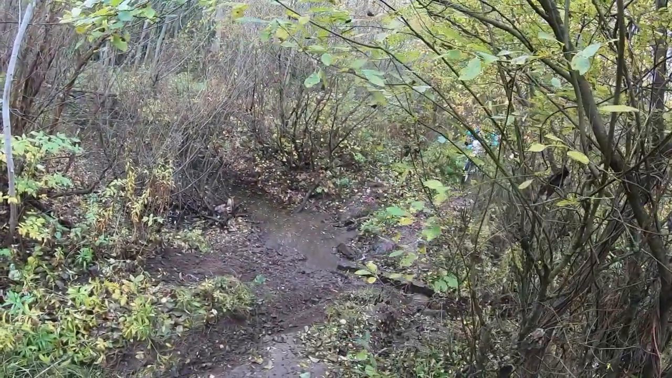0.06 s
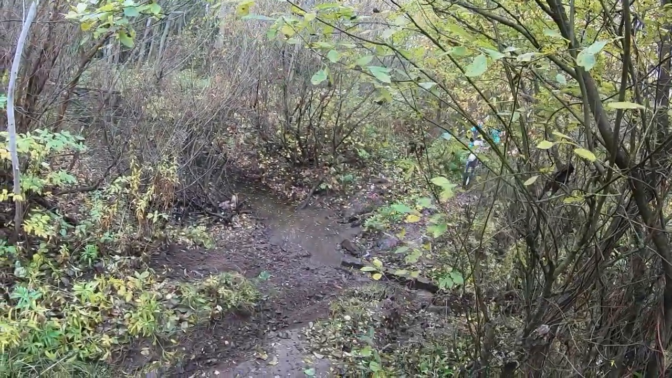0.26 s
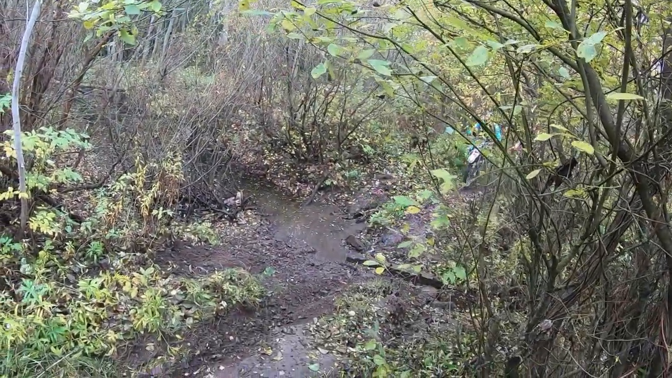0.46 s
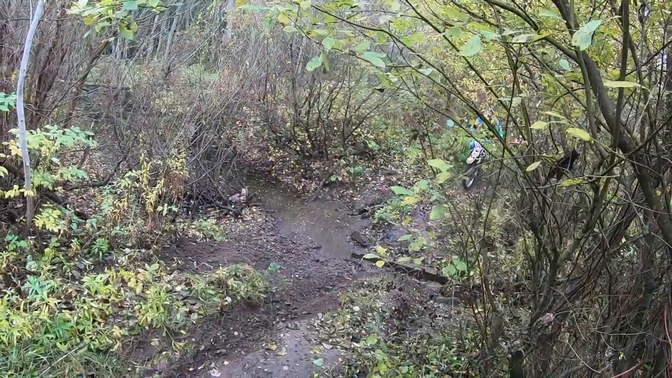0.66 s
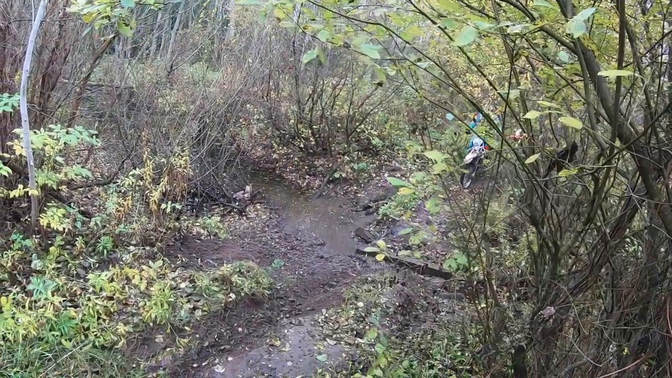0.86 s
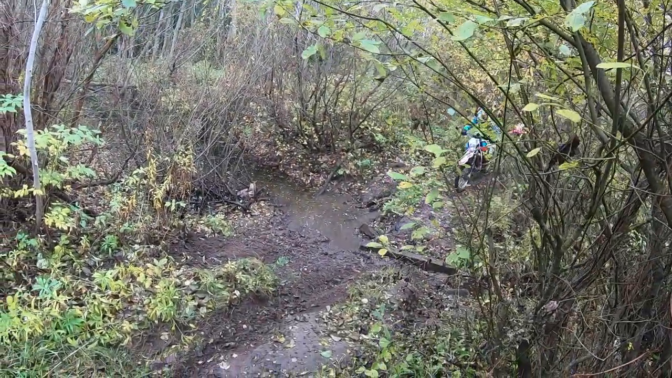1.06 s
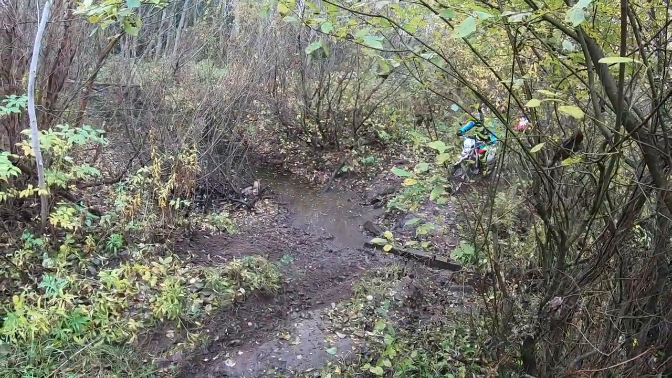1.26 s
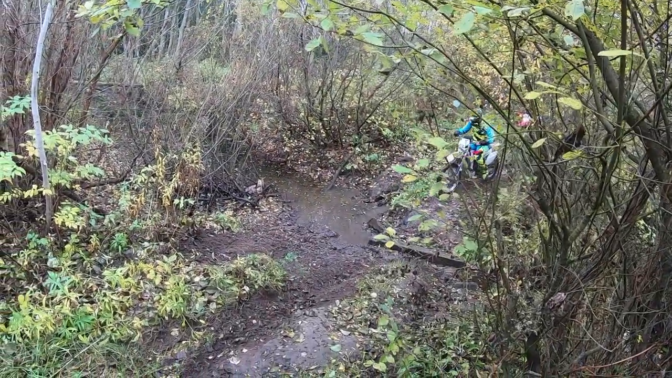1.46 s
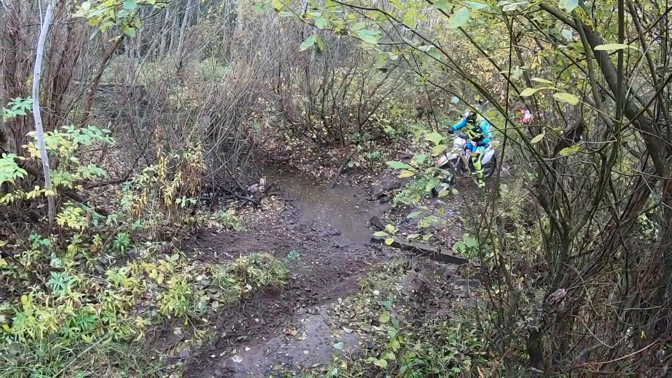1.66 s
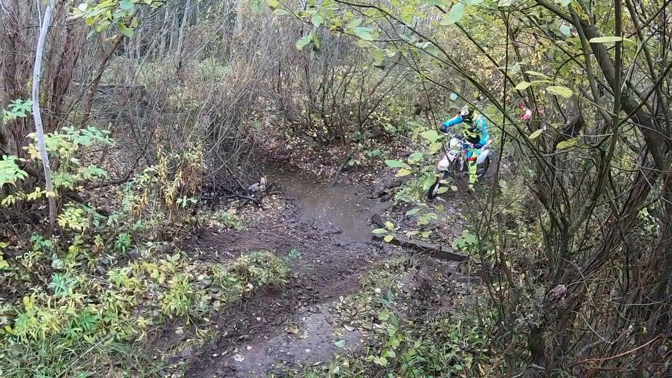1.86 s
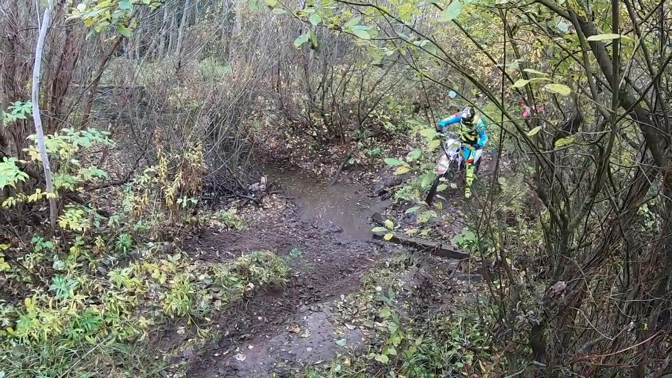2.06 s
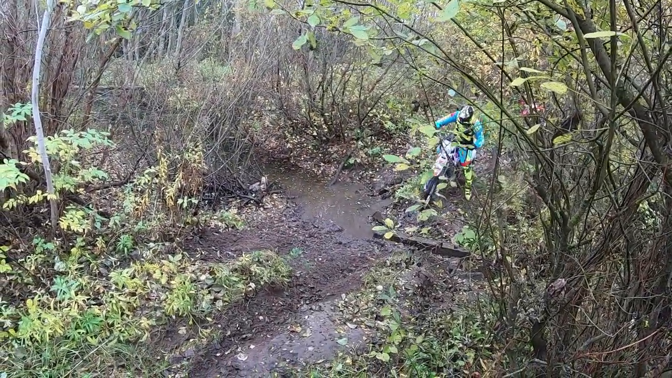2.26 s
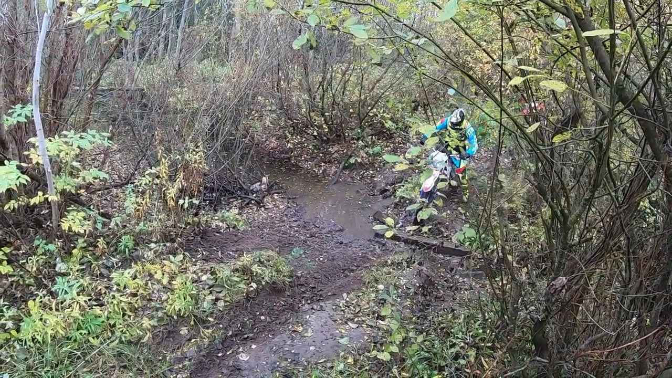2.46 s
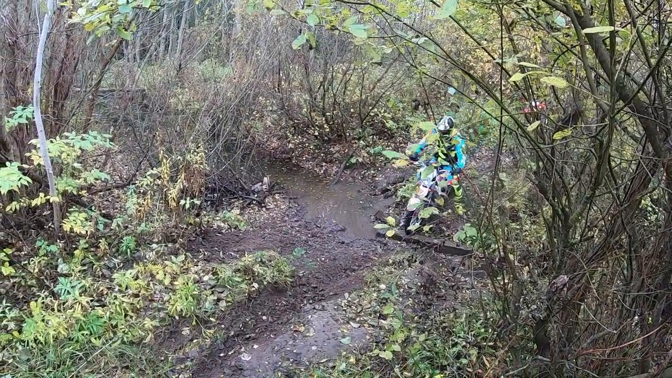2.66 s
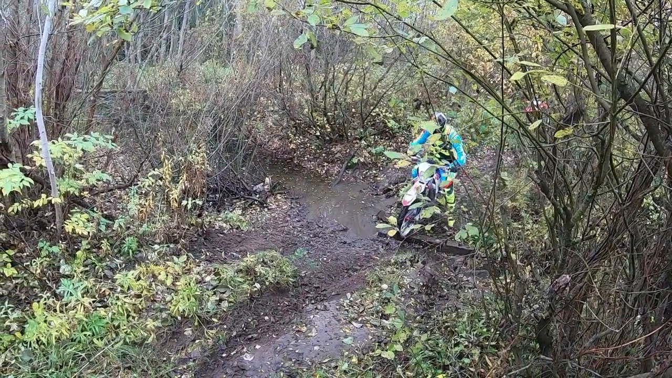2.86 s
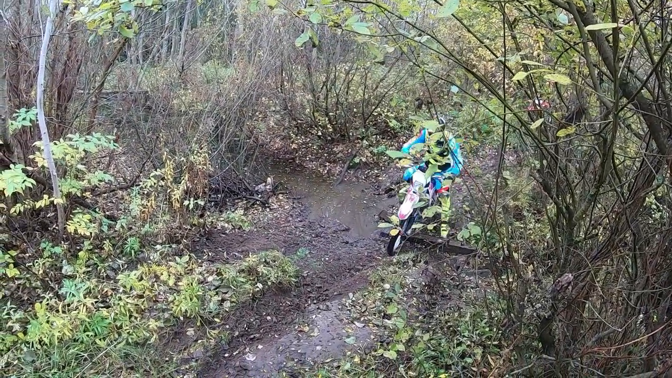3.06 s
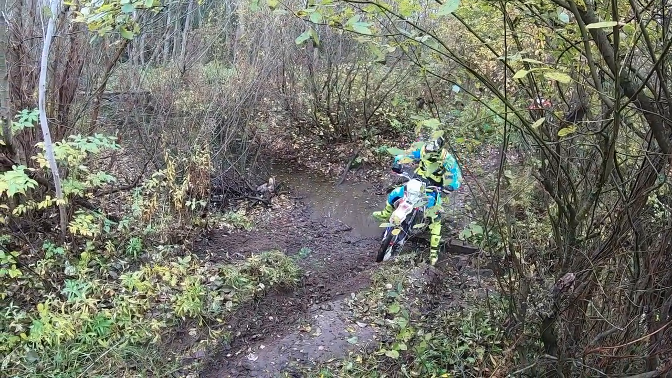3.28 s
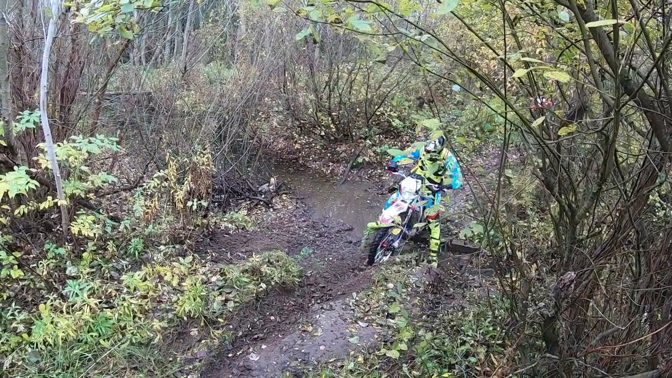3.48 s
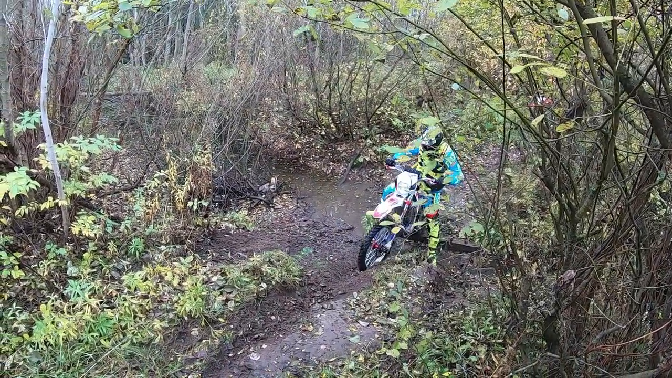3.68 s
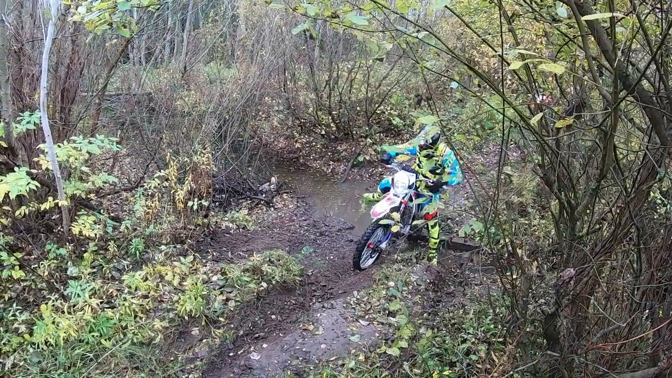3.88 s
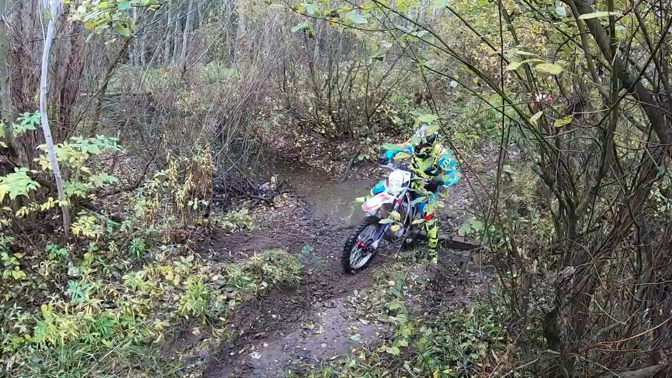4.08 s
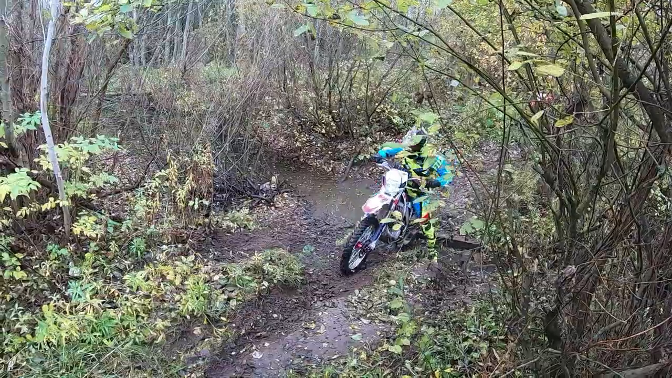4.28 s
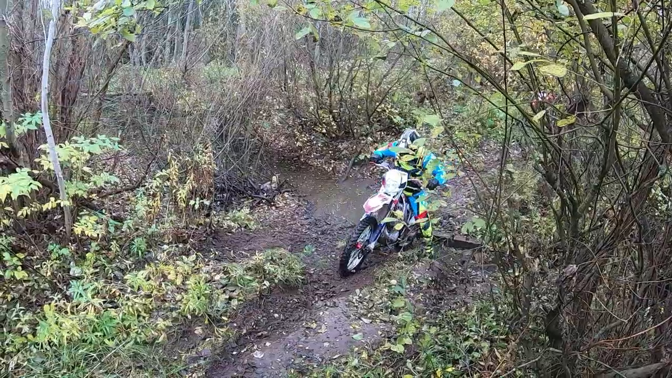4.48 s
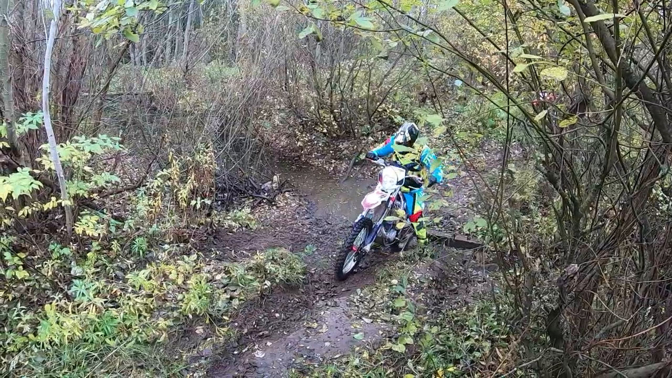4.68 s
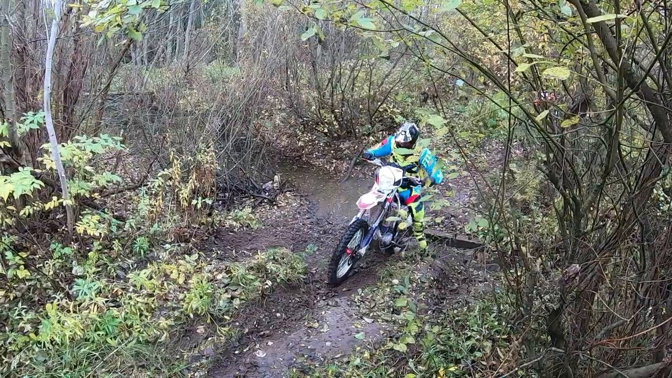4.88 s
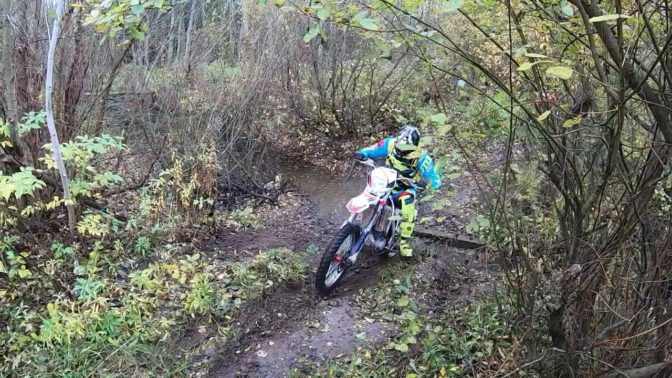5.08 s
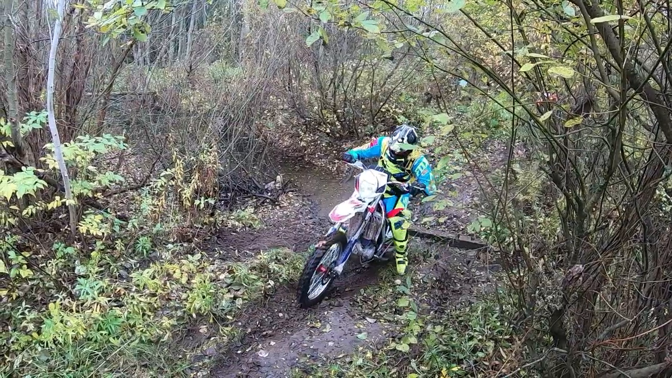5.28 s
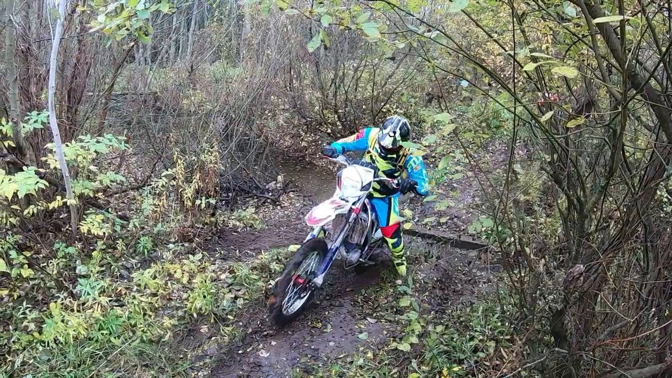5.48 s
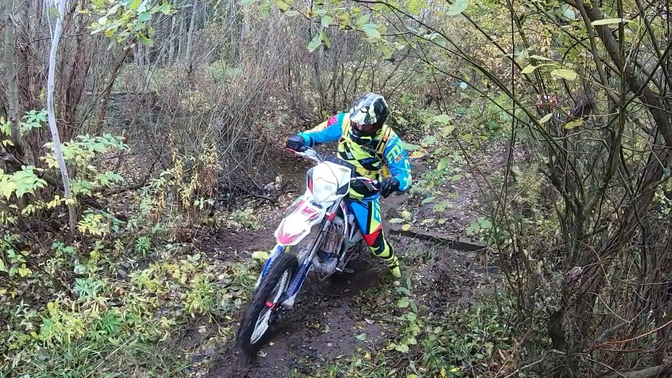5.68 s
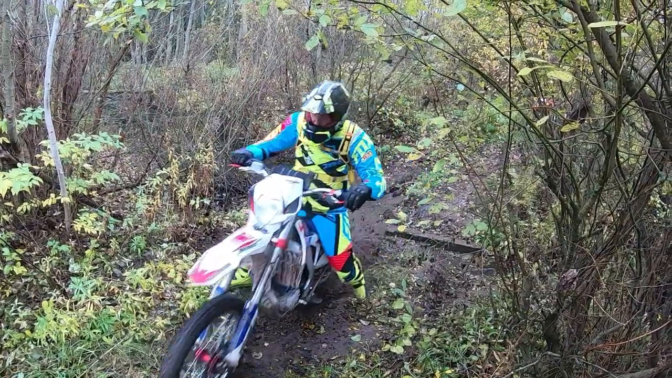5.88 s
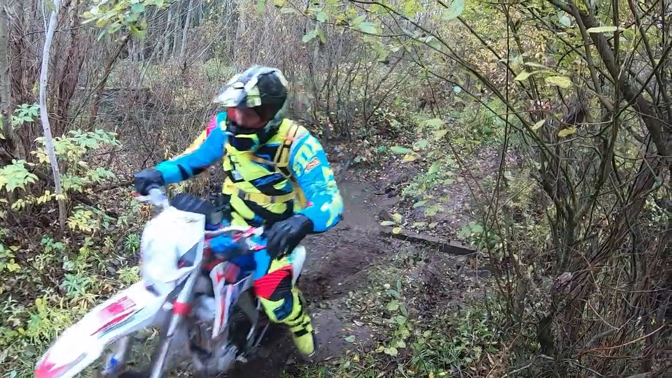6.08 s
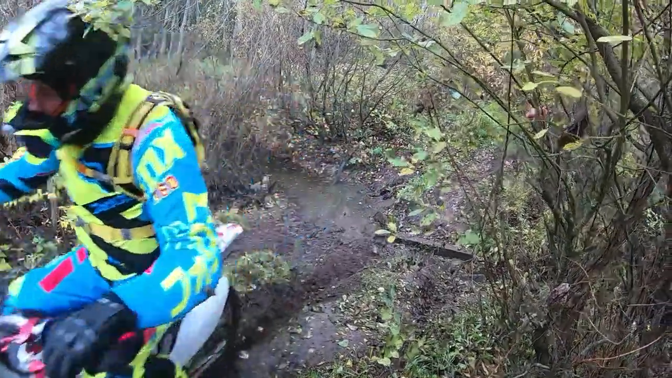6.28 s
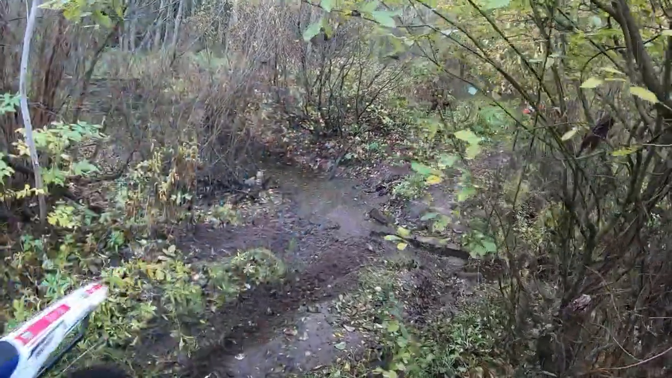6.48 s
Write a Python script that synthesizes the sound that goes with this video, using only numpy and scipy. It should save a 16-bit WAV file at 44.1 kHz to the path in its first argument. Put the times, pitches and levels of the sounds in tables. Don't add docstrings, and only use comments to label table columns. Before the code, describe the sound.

A trail bike's separate low exhaust thumps and breathy intake gulps approach through wet woods. Small gritty snaps of twigs and mud mark the bend. A hard blip at nearly four seconds starts a run of revs, peaking around five and a half, loud and close, before the revs ease and pull again as it passes the small trackside camera. The quiet forest air is nearly masked by the engine.

```python
import sys
import numpy as np
from scipy import signal
from scipy.fft import rfft, irfft, next_fast_len
from scipy.io import wavfile
from scipy.ndimage import uniform_filter1d

SR = 44100
rng = np.random.default_rng(int(sys.argv[2]) if len(sys.argv) > 2 else 0)


def to_wav(s):
    ch = np.atleast_2d(s).T
    pcm = np.round(np.clip(ch, -1, 1) * 32767)
    wavfile.write(sys.argv[1], SR, pcm.astype(np.int16))


def gain_from_db(level_db):
    decades = np.asarray(level_db, float) / 20
    return 10 ** decades


N = 288414
IDLE_PER_S = 12.8


def unit(x):
    return x / np.sqrt(np.mean(x ** 2) + 1e-20)


def even(x, seconds):
    width = int(seconds * SR / 2)
    power = uniform_filter1d(uniform_filter1d(x ** 2, width), width)
    return x / np.sqrt(np.abs(power) + 1e-12)


def along(points, hz):
    f, v = np.transpose(points)
    return np.interp(np.log(hz + 1), np.log(f + 1), v)


def curves(rows):
    s, *cols = np.transpose(rows)
    return [np.interp(np.arange(N) / SR, s, c) for c in cols]


def bumps(peak, rise, fall):
    late = np.arange(N) / SR - peak[:, None]
    return np.exp(-(late / np.where(late < 0, rise[:, None], fall[:, None])) ** 2)


def filtered(x, response):
    m = next_fast_len(N + SR // 2)
    return irfft(rfft(x, m) * response(np.fft.rfftfreq(m, 1 / SR)), m)[..., :N]


def decay(x, t60):
    return signal.lfilter([1], [1, -gain_from_db(-60 / (t60 * SR))], x)


def modes(table, f):
    return sum(gain_from_db(db) * 1j * f * w / (c * c - f * f + 1j * f * w) for c, w, db in table)


# frequency in Hz, left-right likeness from 0 to 1.
LIKENESS = [(60, .99), (150, .995), (350, .995), (640, .85), (1400, .72), (3100, .8), (5600, .55),
            (9000, .15), (15000, .05)]


def pair(spectrum, patchy_db):
    z = signal.stft(rng.standard_normal((2, N + 512)), nperseg=256)[2]
    field = rng.standard_normal(z.shape[1:])
    field = uniform_filter1d(uniform_filter1d(field, 3, 0), 3, 1)
    two = signal.istft(z * gain_from_db(patchy_db * unit(field)), nperseg=256)[1][:, :N]

    def mid_side(hz):
        turn = np.arccos(np.clip(along(LIKENESS, hz), -1, 1)) / 2
        return gain_from_db(along(spectrum, hz)) * [np.cos(turn), np.sin(turn)]

    mid, side = filtered(two, mid_side)
    return unit(np.array([mid + side, mid - side]))


# peak time in seconds, extra firings per second, rise in seconds, fall in seconds.
SPEED_SURGES = [(0.445, 22.81, 0.211, 0.12), (0.914, 11.41, 0.238, 0.219), (1.632, 1.11, 0.388, 0.067),
                (3.002, 9.35, 0.142, 0.257), (3.525, 1.23, 0.309, 0.124), (3.893, 28.67, 0.107, 0.31),
                (4.317, 25.75, 0.106, 0.189), (4.52, 25.12, 0.128, 0.105), (4.925, 31.98, 0.267, 0.202),
                (5.562, 41.78, 0.6, 0.169), (5.744, 18.72, 0.087, 0.6), (6.396, 12.91, 0.217, 0.165)]
# opening time in seconds, shutting time in seconds, opening from 0 to 1.
THROTTLE_TWISTS = [
    (0.213, 0.34, 0.09),
    (.74, 0.897, 0.1),
    (2.67, 3.077, .2),
    (3.768, 3.871, 0.99),
    (4.194, 4.512, 0.7),
    (4.648, 5.026, 0.78),
    (5.034, 5.223, 0.52),
    (5.162, 5.686, 0.64),
    (5.885, 6.363, 0.61),
    (6.32, 6.475, 0.4),
]


def rider():
    peak, extra, rise, fall = np.transpose(SPEED_SURGES)
    opens, shuts, opening = np.transpose(THROTTLE_TWISTS)[..., None]
    twist_s, release_s = 0.045, 0.069
    t = np.arange(N) / SR
    twist = opening * np.clip((t - opens) / twist_s, 0, 1)
    twist = twist * np.exp(-np.clip(t - shuts, 0, None) / release_s)
    return IDLE_PER_S + extra @ bumps(peak, rise, fall), twist.max(axis=0)


def strokes(turns, rate, scatter_db):
    size = gain_from_db(scatter_db * rng.standard_normal(400))
    ticks = np.diff(np.floor(turns), prepend=np.floor(turns[0])).clip(0, 1)
    return ticks * size[turns.astype(int)] * np.sqrt(SR / rate)


def chambers(x, table, lead):
    def twice(f):
        return sum(modes([row], f) ** 2 / (1 + 1j * f / (3 * row[0])) ** 2 for row in table)

    return even(filtered(x, lambda f: twice(f) * np.exp(2j * np.pi * f * lead)), .32)


# time in seconds, level in dB.
ENGINE_LOAD = [(0, -21.5), (.3, -19.5), (.6, -21), (.88, -17), (1.15, -23), (2.6, -22.5), (2.95, -17.5),
               (3.2, -21.5), (3.35, -30), (3.52, -27), (3.6, -19.5), (3.85, -16), (4.15, -20), (4.6, -20.5),
               (4.95, -23.5), (5.2, -25), (5.9, -22.5), (6.54, -21.5)]
# time in seconds, gulp in dB.
INTAKE_FACING = [(0, -12.5), (.4, -3.5), (1, -17.5), (2.6, -2), (2.9, -23), (3.2, -9), (3.6, -7),
                 (3.85, -16), (4.6, -11.5), (5, -11), (5.18, 1), (5.3, 5.5), (5.5, 2.5), (5.64, -13.5),
                 (5.95, -9.5), (6.3, -16.5), (6.54, -9.5)]
# frequency in Hz, width in Hz, level in dB.
SILENCER = [(101.1, 51.3, 0)]
# frequency in Hz, width in Hz, level in dB.
PIPE_SURGE = [(66, 26.3, 0)]
# frequency in Hz, width in Hz, level in dB.
HEADER = [(134.1, 82.7, 14.5), (188.4, 13.6, 0)]
# frequency in Hz, width in Hz, level in dB.
TAIL_PIPE = [(252.7, 75, 3), (315.7, 87, 2.5), (424, 112, 1), (537, 22, -8.5), (720, 135, -5),
             (1100, 210, -13)]


def exhaust(law, rate, turns, blows, screen_db):
    load_db, = curves(ENGINE_LOAD)
    gulp_db, = curves(INTAKE_FACING)
    boom_db = load_db + law(idle_db=-1.52, open_db=-0.64, speed_db=-0.67, near=-0.37)
    body_db = load_db + law(idle_db=-15, open_db=1.5, speed_db=6, near=1.69)
    neck_db = load_db + law(idle_db=-26, open_db=1.5, speed_db=9.5, near=0.82)
    growl_db = load_db + law(idle_db=-25.5, open_db=19, speed_db=7, near=0.46) + 0.38 * gulp_db
    bark_db = load_db + law(idle_db=-27.5, open_db=12.5, speed_db=4.5, near=0.24) + 0.04 * gulp_db
    wash_db = screen_db + law(idle_db=4.5, open_db=-5.5, speed_db=-9, near=0.97)
    thud_db = boom_db - 3 - 14.5 * np.log10(rate / 14)
    gulps = strokes(turns + .455, rate, scatter_db=1.2)
    wash = rng.standard_normal(N) * np.sqrt(unit(decay(blows ** 2, t60=.17)))

    def drive(gulp, wet):
        return blows + gain_from_db(gulp_db + gulp) * gulps + gain_from_db(wash_db + wet) * wash

    pipe = gain_from_db(boom_db) * chambers(drive(gulp=-5.0, wet=-4.5), SILENCER, lead=0.0044)
    pipe += gain_from_db(thud_db) * chambers(drive(gulp=-28.0, wet=3.0), PIPE_SURGE, lead=0.00693)
    pipe += gain_from_db(body_db - 5.0) * chambers(drive(gulp=0, wet=-1.5), HEADER[:1], lead=0.00387)
    pipe += gain_from_db(neck_db) * chambers(drive(gulp=1, wet=-5.5), HEADER[1:], lead=0.0047)
    pipe += gain_from_db(growl_db) * chambers(drive(gulp=4.5, wet=7.5), TAIL_PIPE[:2], lead=0.00236)
    pipe += gain_from_db(bark_db - 3.5) * chambers(drive(gulp=-9.5, wet=5.0), TAIL_PIPE[2:], lead=0.00218)
    breath_db = -25 + 29 * np.log10(rate / 55)
    return pipe + gain_from_db(breath_db) * np.sin(2 * np.pi * (turns + 0.069))


# time in seconds, width in seconds, pitch in Hz,
# swell in dB.
GEAR_WHINE = [
    (.05, .2, 1627, 13),
    (0.479, 0.15, 985, 11),
    (0.918, 0.088, 1991, 8.5),
    (2.499, .05, 997, 10),
    (4.952, .07, 1100, 9),
    (5.5, 0.24, 1500, -21),
    (5.948, 0.071, 1951, 5),
    (6.048, .03, 1200, 6),
    (6.2, 0.1, 1500, 15),
]


def whine():
    s, width, pitch, swell = np.transpose(GEAR_WHINE)
    rest_hz, rest_db = 1500, -16.5
    turn = bumps(s, width, width)
    hz, db = rest_hz + (pitch - rest_hz) @ turn, rest_db + swell @ turn
    swing = decay(decay(rng.standard_normal((2, N)), t60=0.015), t60=0.015)
    angle = 2 * np.pi * np.cumsum(hz) / SR
    return gain_from_db(db) * unit(swing[0] * np.sin(angle) + gain_from_db(-19) * swing[1] * np.sin(2.2 * angle))


# frequency in Hz, width in Hz, level in dB.
CASES = [(733, 920, -2), (1100, 24, 0.5), (1500, 370, -8.5), (1933, 380, -3.5), (2980, 640, 4),
         (3940, 680, 4), (6670, 1200, -0.5), (7530, 170, 0.5), (9650, 1000, 6.5)]
# frequency in Hz, level in dB per Hz.
AIR_RASP = [(300, -19), (480, 6), (650, -3), (900, -2), (1500, 2), (3000, -7), (4400, -13), (5200, -12),
            (8000, -19), (10300, -29.5), (11200, -36.5), (14500, -42), (15600, -69)]


def air_and_clatter(law, rate, throttle, turns, blows, pan_db):
    rasp_db = law(idle_db=-44.5, open_db=12.5, speed_db=2, near=1.0678)
    crack_db = law(idle_db=-13, open_db=3.3, speed_db=-3.4, near=0.26)
    rush = 0.95 * throttle * np.clip(3 * (1 - rate / 41), 0, 1)
    share = np.clip(rush, 0, .95)
    opened = (turns - .58) % 1
    puff = np.clip(opened / .03, 0, 1) * np.exp(-(opened / .36) ** 3)
    early = np.roll(blows * np.sqrt(rate / SR), -round(.004 * SR))
    spit = decay(early, t60=0.014)
    gate = even(1 - share + 1.2 * share * puff + 4 * gain_from_db(crack_db) * spit, 0.11)

    def knock_response(f):
        smear = np.exp(-1j * np.pi * 1.6e-6 * f * f)
        return modes(CASES, f) * smear / (1 + (f / 2200) ** 4)

    knock = filtered(np.roll(blows, -210), knock_response)
    air = unit(filtered(pair(AIR_RASP, patchy_db=2.0), lambda f: 0.72 + np.abs(modes(CASES, f))))
    fizz = filtered(air, lambda f: 1 / (1 + (4500 / (f + 1)) ** 4))
    clearing = np.clip((rate - 36) / 25, 0, .4)
    dull = filtered(air, lambda f: 1 / (1 + (f / 1400) ** 4)) * clearing
    air = gate * (air - dull + (gain_from_db(3.5) - 1) * fizz + whine())
    air = air + gain_from_db(-4.5) * rate / 50 * unit(knock)
    sides_db = np.array([pan_db - 8.5, 0 - pan_db]) / 2
    return gain_from_db(rasp_db + sides_db) * air


# time in seconds, nearness in dB, left-right in dB, screening by bushes in dB.
RIDE_PAST = [(0, 2, 2.5, -2.5), (.6, 2, 0.5, 3), (1.2, -1, 6, 7.5), (1.65, 2, 4.5, -2.5),
             (1.8, 1.5, 4.5, -5), (2.3, 2.5, 4, 1.5), (2.75, 2.5, 4.5, -9.5), (3.3, -1, 6, 4.5),
             (3.6, 3, 4, -3), (4, 4, 5, -3), (5, 7, 5, 0.5), (5.8, 9, 4.5, -6), (6.2, 9, 3, -19.5),
             (6.54, 7, 1.5, -2.5)]


def engine():
    rate, throttle = rider()
    near_db, pan_db, screen_db = curves(RIDE_PAST)

    def law(idle_db, open_db, speed_db, near):
        return idle_db + open_db * throttle + speed_db * np.log2(rate / IDLE_PER_S) + near * near_db

    turns = .7 + np.cumsum(rate) / SR
    blows = strokes(turns, rate, scatter_db=0.72)
    pipe = exhaust(law, rate, turns, blows, screen_db)
    return pipe + air_and_clatter(law, rate, throttle, turns, blows, pan_db)


# frequency in Hz, level in dB per Hz.
FOREST_HUSH = [(15, -47), (25, -44), (79, 0), (113, 1), (274, -36), (566, -41), (1710, -41), (2360, -53),
               (3080, -48), (9810, -71), (15500, -91)]


def forest():
    return gain_from_db(-42) * pair(FOREST_HUSH, patchy_db=1.5)


# start in seconds,
# peak level in dB, 60 dB decay in seconds, left-right in dB.
SHORT_CRACKS = [(0.21, -22.5, 0.034, -2), (0.256, -29, 0.048, -5), (.297, -24.5, 0.037, -5),
                (2.035, -24, 0.0093, -5), (2.194, -20, 0.058, -1), (2.4434, -34.5, 0.038, -4),
                (2.569, -26, 0.047, 3), (2.717, -37.5, 0.18, 2), (2.888, -17.5, 0.016, -11),
                (3.06, -24.5, 0.17, -1), (3.321, -26, 0.12, 0), (3.369, -28, 0.21, 0),
                (3.4026, -18.5, 0.055, 3), (3.508, -32, 0.042, -3.5), (3.525, -24, 0.062, -1),
                (3.5465, -20.5, 0.058, 0.5), (3.774, -25, 0.24, 2), (4.0907, -18, 0.058, -2)]
# frequency in Hz, level in dB per Hz.
MUD_SPLASH = [(410, -27.5), (700, -10), (818, -15), (1830, -3), (2460, -17.5), (2950, -8), (4890, -17.5),
              (7120, -19.5), (15500, -43.5)]


def cracks():
    shape, t = np.zeros((2, N + SR)), np.arange(SR // 4) / SR
    for s, db, t60, pan_db in SHORT_CRACKS:
        burst = gain_from_db(db - 5 - 60 * t / t60) * (1 - np.exp(-t / 0.0034))
        start = round(s * SR)
        shape[:, start:start + len(t)] += burst * gain_from_db([[pan_db / 2], [-pan_db / 2]])
    return shape[:, :N] * pair(MUD_SPLASH, patchy_db=5.5)


def scene():
    return engine() + forest() + cracks()


# frequency in Hz, left-right in dB.
PORT_COLOUR = [(40, .1), (150, .25), (380, .6), (700, .6), (1300, 2.5), (2400, 1.8), (5000, .4), (9000, 2),
               (15000, 1)]
# frequency in Hz, lead of the left in radians.
PORT_PHASE = [(200, 0), (860, .3), (1300, -.4), (2070, .3), (3200, -.3), (4500, -.1), (7700, 1.2),
              (9000, 2)]


def microphones(f):
    half = np.array([[.5], [-.5]])
    ports = gain_from_db(half * along(PORT_COLOUR, f)) * np.exp(1j * half * along(PORT_PHASE, f))
    return ports / (1 + (30 / (f + 1)) ** 4)


def low_pass(x):
    return signal.sosfilt(signal.butter(12, 15640, fs=SR, output="sos"), x)


def record(dry):
    x = filtered(dry, microphones)
    x = x / (1 + np.abs(x / .8) ** 4) ** (1 / 4)
    return low_pass(x)


dry = scene()
out = record(dry)
to_wav(out)
```